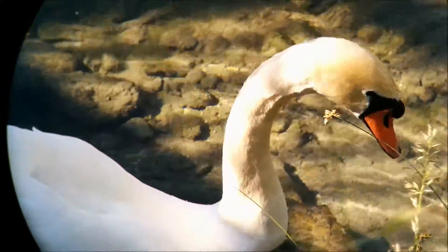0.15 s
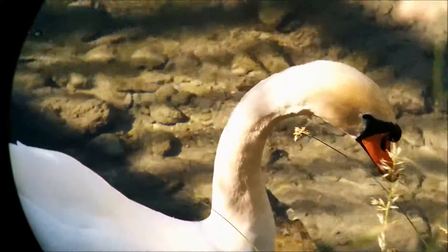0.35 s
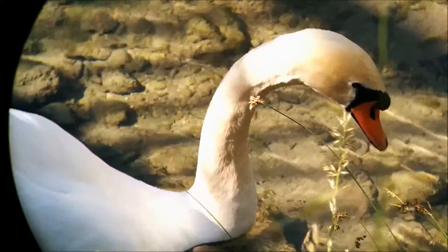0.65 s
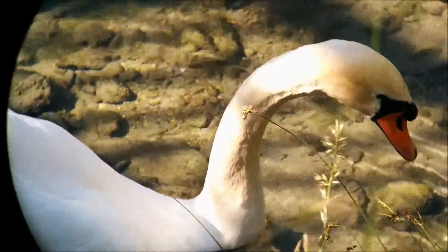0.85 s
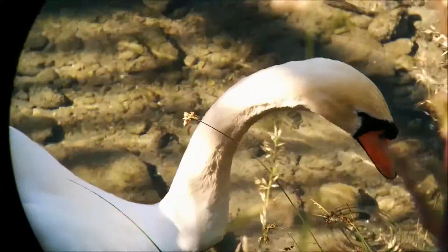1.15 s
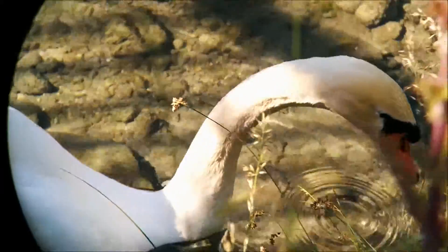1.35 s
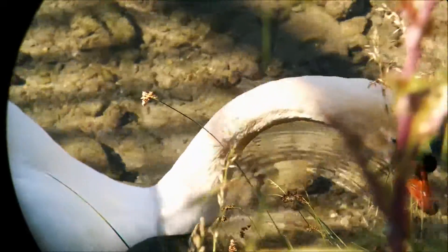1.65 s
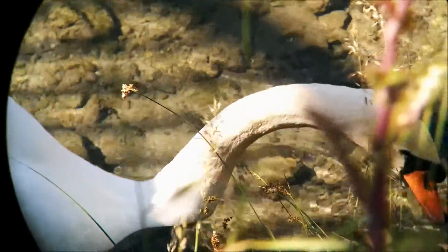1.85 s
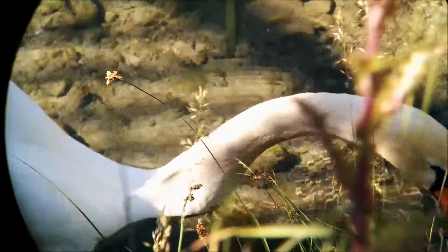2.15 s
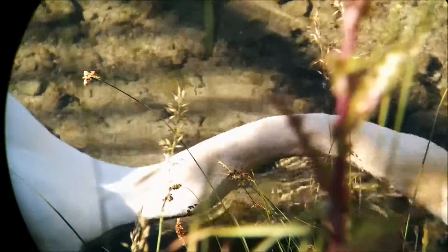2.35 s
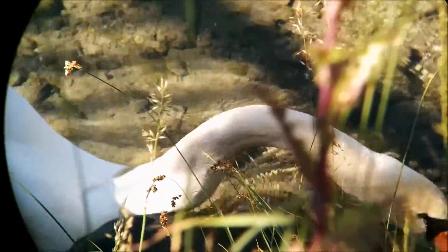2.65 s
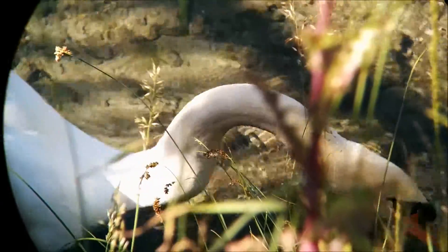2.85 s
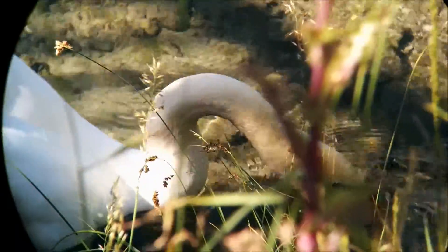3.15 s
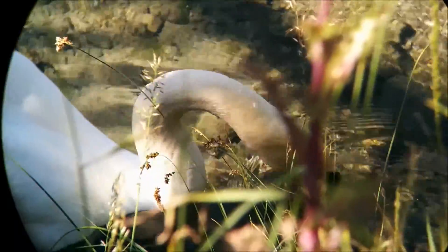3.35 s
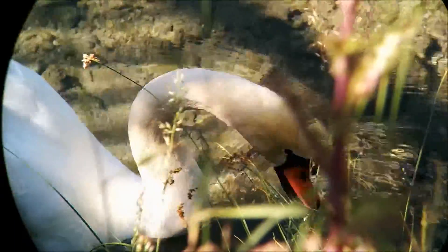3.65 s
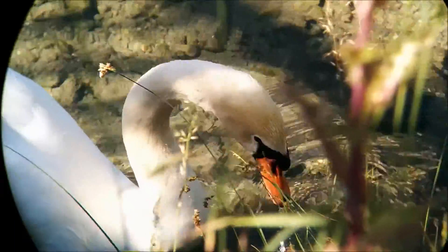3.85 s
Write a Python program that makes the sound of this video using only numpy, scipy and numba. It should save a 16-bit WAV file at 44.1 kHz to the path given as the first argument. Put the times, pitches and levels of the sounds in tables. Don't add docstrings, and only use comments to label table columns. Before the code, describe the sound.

A swan hisses close by in shallow water. From 0 to about 1.1 seconds a loud, hollow rush of breath swells, then darkens and fades. From 1.1 seconds it breaks into short wet snorts, sparse and weaker around 1.3 to 1.8, then a stronger low fluttering exhalation from 2 to 3.3, sputtering unevenly to the end. Faint wind bumps, two tiny grass ticks near 2.7 and 2.8, soft steady water ambience.

```python
import sys
import numpy as np
from scipy import signal
from scipy.fft import rfft, irfft
from scipy.io import wavfile
from scipy.ndimage import uniform_filter1d
from numba import njit

SR = 44100
rng = np.random.default_rng(int(sys.argv[2]) if len(sys.argv) > 2 else 0)


def dump(signal):
    limited = np.clip(np.atleast_2d(signal).T, -1, 1)
    pcm = np.round(limited * 32767).astype(np.int16)
    wavfile.write(sys.argv[1], SR, pcm)


def invert_db(x):
    u = np.asarray(x, float) / 20
    return 10 ** u


N = 176400
T = np.arange(N) / SR
BIN_HZ = np.arange(N // 2 + 1) * SR / N

# time in seconds, level in dB.
EFFORT = [(0.0, -43), (0.14, -36.5), (0.3, -35), (0.42, -34), (0.67, -37), (0.91, -41), (1.17, -48),
          (1.31, -67), (1.54, -61.5), (1.77, -60), (2.0, -46.5), (2.41, -47), (2.6, -46), (3.03, -41.5),
          (3.13, -42), (3.29, -53), (3.52, -60), (4.0, -49)]
# centre in Hz, width in Hz, level in dB.
GAPE = [(282, 136, -8.5), (720, 220, -12.5), (1010, 190, 3), (1570, 970, -12.5), (2670, 570, -12.5),
        (3780, 630, -0.5), (4530, 660, -8), (7000, 1170, -22)]
WIDE = [(340, 215, -17), (772, 213, 2), (1170, 182, 5), (1730, 1050, -3.5), (2810, 860, -3.5),
        (4330, 280, -11.5), (4860, 230, -11.5), (7450, 1850, -25.5)]
NARROWING = [(460, 430, -9), (1019, 97, 3), (1250, 160, -9), (1840, 440, -6), (2340, 690, -9.5),
             (4050, 260, -26.5), (4950, 750, -19), (7260, 3200, -35.5)]
CLOSING = [(496, 320, -10), (894, 200, -0.5), (1106, 230, -5.5), (1840, 210, -9), (2300, 390, -20),
           (3860, 310, -12.5), (5380, 460, -28.5), (6940, 1700, -31.5)]
SHUT = [(393, 620, -17.5), (900, 106, 9.5), (1110, 450, -30), (1770, 320, -15), (2300, 280, -25),
        (3580, 450, -23), (5350, 580, -36), (6840, 1500, -43)]
STRETCHED = [(347, 226, -11), (865, 265, -2.5), (1380, 314, 0), (1664, 300, 5), (2390, 140, -19.5),
             (3630, 520, -20), (3780, 890, -35.5), (6200, 2000, -39.5)]
CURLED = [(320, 267, 4.5), (862, 158, 9.5), (1420, 240, -37), (1520, 370, 6), (2237, 226, 10),
          (3850, 260, -4.5), (4800, 520, -53.5), (6500, 3000, -39)]
REACHING = [(316, 105, -7.5), (837, 260, -1.5), (1450, 260, 0), (1527, 170, 2.5), (2500, 1300, -44),
            (3600, 350, -30), (4400, 440, -40), (6500, 3500, -45)]
DIPPING = [(370, 430, -8.5), (946, 224, 0.5), (1443, 290, -2), (1777, 260, 3.7), (2314, 230, -8),
           (3580, 430, -20), (4080, 700, -33.5), (5900, 2000, -43)]
OPENING = [(303, 180, -3.5), (810, 820, -2.5), (920, 250, 3.5), (1460, 570, -3), (2600, 730, -31),
           (3710, 670, 1.5), (4440, 500, -9.5), (7100, 1270, -20)]
TURNING = [(350, 160, -10.5), (780, 196, -2.5), (1162, 170, 2.5), (1750, 280, 1.5), (2590, 420, 0.5),
           (3800, 670, -3.5), (4600, 730, -9), (7340, 1840, -29.5)]
RISING = [(325, 360, -17), (830, 210, -2), (1400, 210, -7), (1670, 210, 1.5), (2230, 210, -6.5),
          (3730, 270, -25), (4800, 600, -47), (6500, 3000, -48)]


def rms_one(x):
    return x / np.sqrt(np.mean(x ** 2) + 1e-20)


def drift(rate_hz):
    hop, settle = 40, 2000
    r = np.exp(-2 * np.pi * rate_hz * hop / SR)
    noise = rng.standard_normal(N // hop + settle + 2)
    slow = signal.lfilter([1], [1, -2 * r, r * r], noise)[settle:]
    return np.interp(np.arange(N) / hop, np.arange(len(slow)), rms_one(slow))


@njit
def resonate(x, r, c):
    y = np.zeros(len(x))
    for i in range(2, len(x)):
        drive = (1 - r[i] ** 2) / 2 * (x[i] - x[i - 2])
        y[i] = drive + 2 * r[i] * c[i] * y[i - 1] - r[i] ** 2 * y[i - 2]
    return y


def noise_band(low_hz, high_hz):
    sos = signal.butter(2, [low_hz, high_hz], "band", fs=SR, output="sos")
    return rms_one(signal.sosfilt(sos, rng.standard_normal(N)))


def bump(centre_s, length_s, power=2):
    return np.exp(-0.5 * (np.abs(T - centre_s) / (length_s / 2)) ** power)


def swan():
    steadied = 0.47
    leak_per_octave, snort_tilt_db_per_octave = 0.34, -1.5
    rings, octaves = throat(windpipe(rng.standard_normal(N)))
    power = rings.sum(axis=0) ** 2
    local_rms = np.sqrt(uniform_filter1d(uniform_filter1d(power, size=200), size=200) + 0.02)
    stream_db, closed_db, snorts, loose = airflow()
    stream = invert_db(stream_db + closed_db / (1 + leak_per_octave * octaves)) / local_rms ** (steadied * loose)
    bursts = snorts / local_rms * invert_db(snort_tilt_db_per_octave * octaves)
    return np.sum(rings * np.hypot(stream, bursts), axis=0)


def airflow():
    # peak in seconds, level in dB, rise in seconds, fall in seconds.
    snort_rows = [(1.139, -43.5, 0.01, 0.0095), (1.215, -39.5, 0.0052, 0.0045),
                  (1.236, -54, 0.0048, 0.0034), (1.273, -46, 0.0048, 0.0055), (1.294, -61, 0.0053, 0.036),
                  (1.336, -41.5, 0.007, 0.012), (1.373, -54, 0.0044, 0.0091), (1.405, -57, 0.0053, 0.021),
                  (1.434, -57.5, 0.0043, 0.0056), (1.461, -61, 0.0063, 0.0041), (1.542, -49, 0.011, 0.0065),
                  (1.602, -51, 0.006, 0.0046), (1.687, -50, 0.0063, 0.0081), (1.74, -48.5, 0.015, 0.0091),
                  (1.77, -47.5, 0.012, 0.0053), (1.813, -45, 0.0052, 0.0065), (1.876, -42, 0.0049, 0.0057),
                  (1.945, -46.5, 0.0074, 0.0104), (1.997, -43, 0.0071, 0.0084), (2.045, -43, 0.0039, 0.009),
                  (2.116, -35.5, 0.0044, 0.0117), (2.196, -43, 0.0044, 0.018), (2.284, -54, 0.0052, 0.0097),
                  (2.341, -57, 0.021, 0.0103), (2.394, -45, 0.003, 0.041), (2.48, -38, 0.013, 0.0035),
                  (2.491, -38.5, 0.0064, 0.0101), (2.551, -43.5, 0.0155, 0.005),
                  (2.59, -44.5, 0.025, 0.0052), (2.648, -41.5, 0.011, 0.0058),
                  (2.731, -42.5, 0.0094, 0.0081), (2.761, -46, 0.0097, 0.0173),
                  (2.836, -50, 0.0074, 0.0053), (2.853, -48, 0.0102, 0.0078), (2.876, -44, 0.015, 0.0042),
                  (2.968, -41.5, 0.0072, 0.038), (3.188, -44, 0.014, 0.022), (3.217, -40, 0.0064, 0.0042),
                  (3.298, -42.5, 0.0077, 0.0049), (3.32, -43, 0.0038, 0.003), (3.38, -67.5, 0.0065, 0.0122),
                  (3.426, -52.1, 0.0163, 0.023), (3.485, -47, 0.008, 0.0069), (3.527, -45.5, 0.012, 0.0066),
                  (3.59, -47.5, 0.0113, 0.006), (3.72, -49, 0.0086, 0.009), (3.774, -59, 0.0044, 0.0103),
                  (3.885, -53.5, 0.012, 0.0061), (3.915, -44.5, 0.0052, 0.0056)]
    # centre in seconds, length in seconds, level
    # change in dB.
    closures = [(1.108, 0.019, -12), (1.191, 0.04, -8), (1.315, .015, 2), (1.828, .015, -9),
                (1.926, 0.014, -11.5), (1.965, 0.0077, 3), (2.075, 0.011, -5), (2.177, 0.017, -9.5),
                (2.261, 0.035, -13.5), (2.299, .025, -10), (2.368, 0.025, -4.5), (2.47, 0.011, -2),
                (2.525, 0.0092, 0.5), (2.573, 0.0066, -8), (2.631, 0.013, -8), (2.708, 0.028, -1),
                (2.799, 0.021, -16), (2.902, 0.0081, -5), (3.133, 0.028, -7.5), (3.286, 0.0098, -13),
                (3.304, 0.013, -12), (3.401, 0.021, -10), (3.45, .02, -2), (3.797, 0.017, -11),
                (3.83, 0.031, -10), (3.862, .012, -5), (3.897, .01, -5.5), (3.937, 0.024, -9)]
    flutter_from_s, flutter_onset_s = 0.85, 0.3
    hiss_flutter_db, loose_flutter_db, snort_db = 0.5, 0.5, -0.9

    loose = np.clip((T - flutter_from_s) / flutter_onset_s, 0, 1)
    flutter_db = (hiss_flutter_db + loose * loose_flutter_db) * (0.4 * drift(12) + 0.9 * drift(45))
    stream_db = np.interp(T, *np.transpose(EFFORT)) + flutter_db
    closed_db = np.zeros(N)
    for s, length_s, db in closures:
        closed_db += db * bump(s, length_s, np.where(T < s, 2, 4))
    snorts = np.zeros(N)
    for s, db, rise_s, fall_s in snort_rows:
        snorts += invert_db(db + snort_db) * np.exp(-((T - s) / np.where(T < s, rise_s, fall_s)) ** 2)
    return stream_db, closed_db, snorts, loose


def windpipe(x):
    spacing_hz, dull_hz, echo = 272.1, 3620, 0.27
    delay = np.exp(-2j * np.pi * BIN_HZ / spacing_hz)
    loop = echo / np.sqrt(1 + (BIN_HZ / dull_hz) ** 2)
    return irfft(rfft(x) * np.sqrt(1 - loop ** 2) / (1 - loop * delay), N)


def throat(air):
    # time in seconds, posture.
    postures = [(.02, OPENING), (.17, GAPE), (.33, TURNING), (.52, WIDE), (.76, NARROWING), (1.02, CLOSING),
                (1.12, CLOSING), (1.2, SHUT), (1.481, SHUT), (1.7, REACHING), (2.0, STRETCHED),
                (2.7, STRETCHED), (3.0, DIPPING), (3.3, DIPPING), (3.42, CURLED), (3.82, CURLED),
                (3.9, RISING), (4.0, RISING)]
    # time in seconds, centre in Hz, width in Hz, level in dB.
    nostril = [(0, 2300, 300, -22.5), (.45, 2300, 250, -13), (.8, 2920, 250, -21), (1.05, 3090, 180, -19),
               (1.5, 2900, 150, -27), (2.3, 2900, 250, -34), (3.0, 2840, 300, -29), (4.0, 2900, 300, -24)]
    wobble, wobble_hz = 0.012, 14.0
    own_flutter_db, flutter_hz, flutter_knee_hz = 1.8, 33.0, 1490
    snort_knee_hz = 1520

    times = [s for s, _ in postures]
    shapes = np.array([posture for _, posture in postures])
    tracks = [(times, *shape.T) for shape in shapes.transpose(1, 0, 2)]
    tracks.append(np.transpose(nostril))
    rings, octaves, power = [], [], 0
    for k, (s, *columns) in enumerate(tracks):
        hz, width_hz, db = (np.interp(T, s, column) for column in columns)
        hz = hz * (1 + wobble * drift(wobble_hz))
        r, c = np.exp(-np.pi * width_hz * 2 / SR), np.cos(2 * np.pi * hz / SR)
        ring = air
        for _ in range(3):
            ring = resonate(ring, r, c)
        flutter_db = own_flutter_db * np.clip(flutter_knee_hz / hz, 0.4, 1.8) * drift(flutter_hz)
        rings.append((-1) ** k * invert_db(db + flutter_db) * ring)
        octaves.append(np.maximum(np.log2(hz / snort_knee_hz), 0))
        power = power + invert_db(db) ** 2 * width_hz * 2 / SR
    return np.array(rings) / np.sqrt(power), np.array(octaves)


def grass():
    # start in seconds, peak in dB, centre in Hz.
    ticks = [
        (2.692, -67, 9500),
        (2.816, -66, 7500),
    ]
    t60_s = 0.032
    out = np.zeros(N)
    for s, db, hz in ticks:
        decay = (T > s) * invert_db(-60 * np.maximum(T - s, 0) / t60_s)
        out += invert_db(db) * noise_band(hz * 0.74, hz * 1.2) * decay
    return out


def wind():
    # centre in seconds, level in dB, length in seconds.
    bumps = [(.005, -45.5, 0.034), (0.106, -46.5, 0.048), (0.312, -54.5, .04), (0.707, -53.5, 0.033),
             (0.854, -59, 0.05), (1.331, -65, 0.044), (1.843, -62, 0.065), (2.487, -59, 0.054),
             (2.834, -61.5, 0.073), (3.19, -62.5, 0.11), (3.293, -51.5, 0.031), (3.49, -64, 0.055),
             (3.896, -61, 0.072)]
    # centre in seconds, length in seconds, depth in dB.
    lulls = [(0.682, 0.13, -9), (1.057, 0.11, -19), (1.624, .08, -4), (2.2, .08, -11), (2.988, 0.083, -12)]
    low_hz, high_hz, bump_cut_hz = 55, 327, 427
    level_db, lump_db, lumps_per_s = -66.5, 2.5, 10
    follows = 0.24

    effort_db = np.interp(T, *np.transpose(EFFORT))
    wind_db = level_db + follows * (effort_db - effort_db.mean()) + lump_db * drift(lumps_per_s)
    wind_db = wind_db + sum(db * bump(s, length_s) for s, length_s, db in lulls)
    bump_gain = sum(invert_db(db) * bump(s, length_s) for s, db, length_s in bumps)
    return invert_db(wind_db) * noise_band(low_hz, high_hz) + bump_gain * noise_band(low_hz, bump_cut_hz)


def ambience():
    # frequency in Hz, density in dB per Hz.
    spectrum = [(30, -9), (60, -4), (300, 7.5), (900, -11.5), (1800, -5), (3000, -12), (6000, -21.5),
                (15600, -25)]
    level_db = -66
    hz, db = np.transpose(spectrum)
    colour = invert_db(np.interp(np.log(BIN_HZ + 1), np.log(hz), db))
    return invert_db(level_db) * rms_one(irfft(rfft(rng.standard_normal(N)) * colour, N))


def scene():
    return (swan() + grass() + wind() + ambience())[None]


def top_cut(x):
    return signal.sosfilt(signal.butter(12, 15760, fs=SR, output="sos"), x)


def record(dry):
    return top_cut(dry)


dry = scene()
out = record(dry)
dump(out)
```